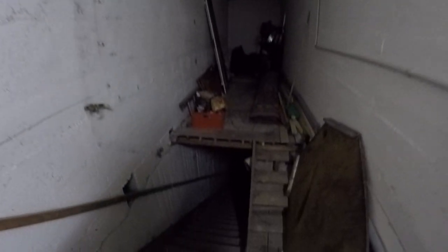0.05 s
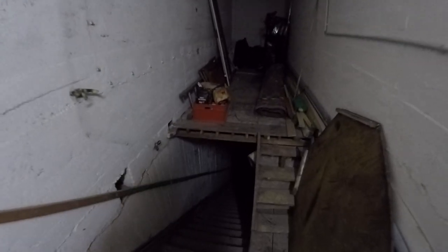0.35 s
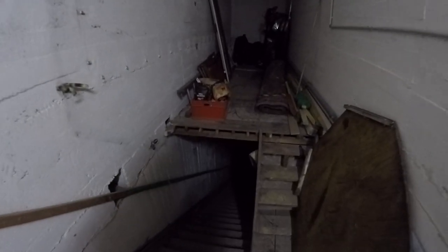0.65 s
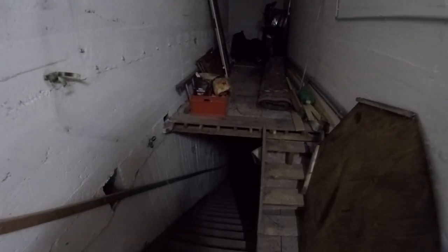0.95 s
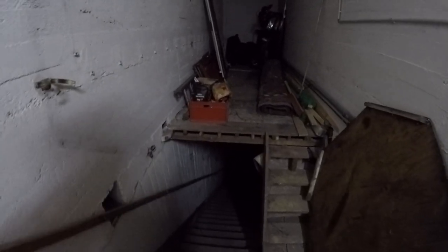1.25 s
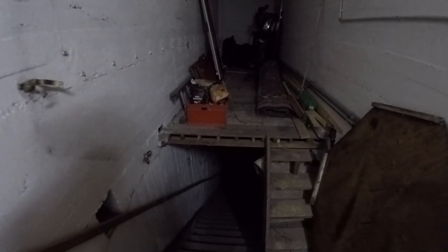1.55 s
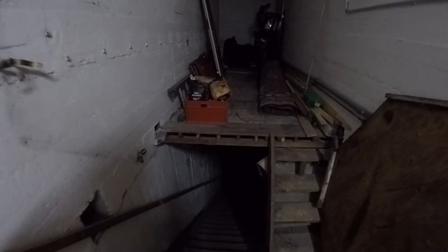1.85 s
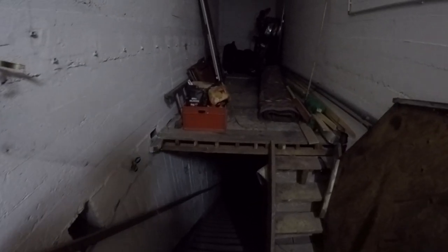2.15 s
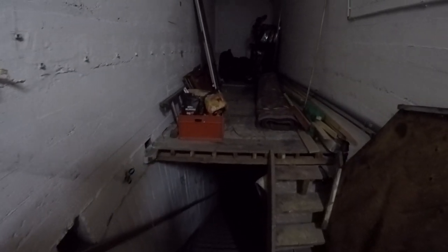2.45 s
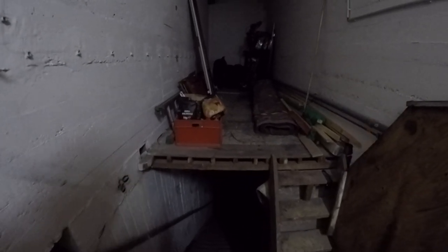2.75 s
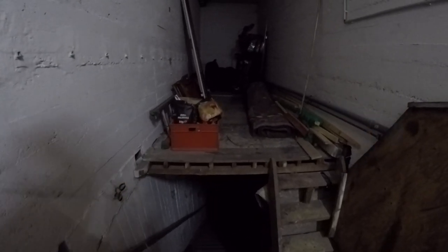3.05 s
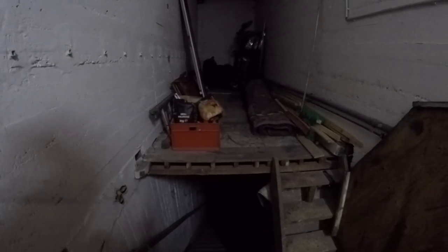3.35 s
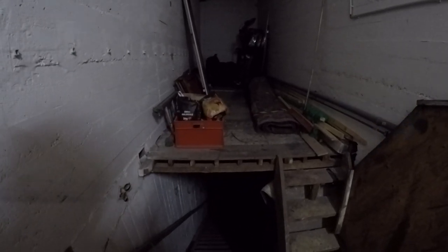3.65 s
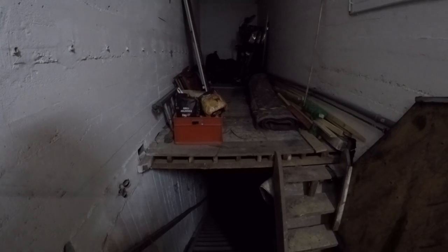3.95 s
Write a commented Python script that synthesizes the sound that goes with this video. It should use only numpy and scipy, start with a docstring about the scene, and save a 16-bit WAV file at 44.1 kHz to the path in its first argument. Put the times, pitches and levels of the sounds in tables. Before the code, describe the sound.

Someone walks slowly between bare concrete walls, with echoing heel knocks, short gritty scuffs and a faint shoe squeak at the end. The steps sit in the centre, while a wide, low rumble and a wavering machine hum fill the background.

```python
"""Slow footsteps in the narrow stairwell of a concrete bunker, dead centre in a stereo microphone pair.
Heels knock, soles scrape and shuffle over grit, and rubber squeaks once, all echoing between bare walls.
Clothes rustle softly as the legs swing. Behind the walker the building rumbles, wide and deep,
and a distant machine hums in low, beating tones."""
import sys
import numpy as np
from scipy import signal
from scipy.fft import rfft, irfft
from scipy.io import wavfile

SR = 44100
rng = np.random.default_rng(int(sys.argv[2]) if len(sys.argv) > 2 else 0)


def int16_out(signal):
    """Quantize to a 16-bit WAV file."""
    q = np.round(np.clip(np.atleast_2d(signal).T, -1, 1) * 32767)
    wavfile.write(sys.argv[1], SR, q.astype(np.int16))


N = 176400
TIME = np.arange(N) / SR


def heel_knocks():
    """Each contact is a softened click that rings shoe and floor; the weight behind it adds a thud."""
    # shoe meeting floor: start_s, level_db, hardness_hz (low-pass corner), thud_db
    contacts = [(.128, -11, 1300, -17), (.157, -10, 2000, -10), (.202, -8.5, 795, -19),
                (0.6, -14, 1800, -20), (0.8776, 4.5, 1700, -2.5), (.923, -4.5, 495, 6.5),
                (1.062, -13, 796, -1), (1.698, -2.5, 1100, -4), (2.602, 4, 1590, -12),
                (2.619, -7.5, 3000, -15), (2.662, -7, 1000, -9), (2.828, -4, 1000, -5.5),
                (3.190, -11, 1190, -11), (3.287, -5, 2210, -17)]
    # ring of shoe and floor: pitch_hz, level_db, t60_s
    shoe_modes = [(360, -24.5, 0.013), (452, -31.5, 0.031), (597, -24, 0.014), (970, -19.5, 0.01),
                  (1370, -24.5, 0.011), (1930, -19, 0.0053), (3240, -24.5, 0.0063), (4600, -22, 0.0054)]
    # floor thumping under the walker's weight: pitch_hz, level_db, t60_s
    thud_modes = [(210, -28.5, 0.064), (252, -28, 0.1), (341, -25, 0.051), (418, -25, 0.04)]
    out, click = np.zeros(N), signal.unit_impulse(SR)
    shoe = sum((-1) ** k * from_db(db) * ring(click, hz, t60)
               for k, (hz, db, t60) in enumerate(shoe_modes))
    body = from_db(-9.5) * click + shoe
    thud = sum(from_db(db) * ring(click, hz, t60) for hz, db, t60 in thud_modes)
    for start, db, hardness_hz, thud_db in contacts:
        knock = butter(body + from_db(thud_db) * thud, hardness_hz, "low")
        add(out, start, from_db(db) * stairwell(knock, room_db=-1))
    return butter(out, 178, "high")


def sole_scrapes():
    """A sole grinds over grit: fairly even grains, full in the midrange, that stop quickly."""
    # scrapes: start_s, length_s, level_db, tilt_db_per_octave, attack_s
    strokes = [(.894, 0.015, -39, 3, 0.0044), (.95, 0.037, -44.5, 0, 0.012),
               (2.065, 0.041, -28, 0.7, 0.0059), (2.12, 0.12, -41.5, 0, 0.033),
               (2.338, 0.029, -45.5, 1, 0.0068), (2.621, 0.011, -38, -0.5, 0.002),
               (2.65, 0.045, -46, 4.5, 0.0091), (2.70, 0.064, -44, 2, 0.037),
               (3.287, 0.027, -37.5, 0.5, 0.0062), (3.311, 0.017, -27, 0.5, 0.0069),
               (3.345, .04, -47, 0, 0.011)]
    # tone of ground grit: frequency_hz, level_db
    spectrum = [(200, -36), (400, -2), (620, -1.5), (900, -2.5), (1350, -5), (1650, -6.5), (2200, -0.5),
                (2750, -1.5), (3700, -3.5), (5000, -8), (7000, -15.5), (10000, -22.5), (15000, -33)]
    return friction(strokes, spectrum, release_s=0.0065, grains_per_s=4000, room_db=-0.5, spread_db=2.5)


def sole_shuffles():
    """A sole slides lightly: a thinner crackle of uneven grains that lets go more gently."""
    # slides: start_s, length_s, level_db, tilt_db_per_octave, attack_s
    strokes = [(.435, 0.092, -48.5, 1, 0.028), (2.43, 0.046, -42, -1, 0.024), (2.48, 0.12, -53, -2, 0.014),
               (2.522, 0.0083, -42, -3, 0.0042), (2.735, 0.075, -46.5, 2.5, 0.019),
               (3.20, 0.2, -42.5, -1.5, 0.08), (3.44, 0.069, -49, 2.5, .02),
               (3.665, 0.039, -52.5, -3.5, .02), (3.871, 0.0086, -38.5, -0.5, 0.0033),
               (3.912, .012, -44, -20, .004)]
    # tone of brushed grit: frequency_hz, level_db
    spectrum = [(500, -28), (1400, -9), (2200, 0), (3300, 0), (4300, -2.5), (6000, -8.5), (9000, -16),
                (15000, -26)]
    return friction(strokes, spectrum, release_s=0.015, grains_per_s=5000, room_db=-1, spread_db=6.0)


def friction(strokes, spectrum, release_s, grains_per_s, room_db, spread_db):
    """Grains of grit crack under the sole while each stroke rises, holds and lets go."""
    out, t = np.zeros(N), TIME[:SR]
    for start, length, db, tilt_db, attack_s in strokes:
        grain_db = spread_db * np.minimum(rng.exponential(1, SR), 4)
        sizes = from_db(grain_db) * rng.choice([-1, 1], SR)
        grains = sizes * (rng.random(SR) < grains_per_s / SR)
        pressure = np.clip(t / attack_s, 0, 1) * np.exp(-np.maximum(t - length, 0) / release_s)
        stroke = pressure * coloured(grains, spectrum, tilt_db)
        add(out, start, from_db(db) * stairwell(stroke, room_db))
    return out


def sole_squeak():
    """Rubber sticks and slips in a short, rough, rising chirp."""
    # faint squeak: start_s, length_s, level_db, first_hz, last_hz
    chirps = [(3.884, .04, -45, 2920, 3470)]
    out, t = np.zeros(N), TIME[:SR]
    rough_hz = 250
    for start, length, db, first_hz, last_hz in chirps:
        along = np.clip(t / length, 0, 1)
        hz = first_hz + (last_hz - first_hz) * along + rough_hz * drift(rate_hz=700).real[:SR]
        chirp = np.sin(np.pi * along) * np.sin(2 * np.pi * np.cumsum(hz) / SR)
        add(out, start, from_db(db) * stairwell(chirp, room_db=-1))
    return out


def clothes():
    """Cloth rubs in soft, fluttering swells as a leg swings, heard without echo."""
    # bell-shaped rustles: middle_s, half_width_s, level_db
    rustles = [(.12, 0.18, -56), (0.333, 0.076, -54), (1.387, 0.075, -51.5), (1.494, 0.077, -56.5),
               (1.736, .14, -54), (2.025, 0.089, -52.5), (3.133, 0.13, -55), (3.79, 0.072, -59)]
    # tone of the cloth: frequency_hz, level_db
    spectrum = [(400, -21), (1000, 5), (2200, 4.5), (4500, 2), (7000, -3), (10000, -9.5), (15000, -16)]
    swing = sum(from_db(db) * np.exp(-.5 * ((TIME - s) / half) ** 2) for s, half, db in rustles)
    flutter = from_db(0.47 * drift(rate_hz=25).real)
    return swing * flutter * coloured(rng.standard_normal(N), spectrum)


def stairwell(x, room_db):
    """One second of direct sound, near-wall slaps and tail; every spot on the floor echoes differently."""
    gap_s, decay_s = 0.002, 0.0083
    t = TIME[:SR] - gap_s
    slaps = rng.standard_normal(SR) * (t > 0) * np.exp(-abs(t) / decay_s)
    slaps = from_db(-3) * butter(slaps / np.sqrt(np.sum(slaps ** 2)), 2000, "low", order=1)
    return x + signal.fftconvolve(x, slaps + from_db(room_db) * wall_tail())[:SR]


def wall_tail():
    """Dense echoes between the walls build up and die away band by band; unit energy."""
    # reverberation of bare concrete: frequency_hz, t60_s
    decay_times = [(150, 1), (400, 0.61), (1000, 0.54), (2500, 0.41), (5000, 0.39), (12000, 0.46)]
    t, edges, build_s = TIME[:SR], np.geomspace(80, 18000, 8), 0.0057
    white, hz = rfft(rng.standard_normal(SR)), np.fft.rfftfreq(SR, 1 / SR)
    out = np.zeros(SR)
    for lo, hi in zip(edges, edges[1:]):
        band = irfft(white * (hz >= lo) * (hz < hi), SR)
        out += band * np.exp(-np.log(1000) * t / at_hz(decay_times, np.sqrt(lo * hi)))
    out *= 1 - np.exp(-t / build_s)
    return out / np.sqrt(np.sum(out ** 2))


def building_rumble():
    """Room tone: deep noise of the building that swells slowly and thins upward to a steady faint hiss."""
    # rumble alike in both channels: frequency_hz, level_db
    mid_spectrum = [(10, -17), (21, -1), (26, 4), (32, 1.5), (55, -3), (74, 1), (90, -2), (112, -6.5),
                    (128, -5), (150, -12), (250, -17), (310, -24), (420, -26), (600, -32), (1000, -41),
                    (1600, -45), (3000, -49.5), (5000, -53.5), (8000, -59.5), (15000, -65)]
    # rumble opposed between the channels: frequency_hz, level_db
    side_spectrum = [(10, -33), (27, 14.5), (45, -3.5), (65, -5), (105, -9), (140, -18), (200, -14.5),
                     (240, -22), (420, -25.5), (700, -32), (1000, -41), (2000, -52), (4000, -77.5),
                     (7000, -79.5), (15000, -75)]
    # rise and fall of the low end: time_s, gain_db
    swell_points = [(0, -2), (.25, 3.5), (.55, 1.5), (.76, -3.5), (.9, -1), (1.45, 2), (1.8, -1), (2.25, 3),
                    (2.5, 0), (2.85, 1.5), (3.3, 1.5), (3.65, -1.5), (4, 3)]
    mid = from_db(-21.5) * coloured(rng.standard_normal(N), mid_spectrum)
    side = from_db(-22) * coloured(rng.standard_normal(N), side_spectrum)
    noise = stereo(mid, side)
    swell = from_db(np.interp(TIME, *np.transpose(swell_points)))
    return noise + (swell - 1) * butter(noise, 170, "low", order=1)


def machine_hum():
    """Low tones of a distant machine beat and waver, a little stronger on the right."""
    # machine tones: pitch_hz, relative_mid_db, relative_side_db
    tones = [(119.5, -1, -10.5), (122.7, -9.5, -27), (123.55, -5.5, -15), (211, -19, -23.5),
             (269, -21, -24), (360.5, -23.5, -27), (481.5, -31.5, -33)]
    # the hum swelling and fading: time_s, gain_db
    swell_points = [(0, -30.5), (.13, -32.5), (.26, -22.5), (.40, -33), (.50, -24.5), (.62, -25),
                    (.77, -32.5), (.98, -31), (1.08, -22), (1.42, -29), (1.57, -20.5), (1.76, -31),
                    (1.86, -25), (2.08, -24), (2.2, -34), (2.55, -33.5), (2.72, -20), (2.87, -30),
                    (3.17, -21), (3.40, -29.5), (3.68, -31.5), (3.78, -19), (3.92, -38.5), (4, -18)]
    pan_db, waver_depth = 1.2, 0.39

    def tone(hz):
        steady = np.exp(2j * np.pi * (hz * TIME + rng.random()))
        waver = 1 + waver_depth * drift(rate_hz=2.7)
        return rms_one((steady * waver).real)
    swell = from_db(np.interp(TIME, *np.transpose(swell_points)))
    hum = sum(stereo(from_db(db) * tone(hz), from_db(side_db) * tone(hz)) for hz, db, side_db in tones)
    return swell * from_db([[-pan_db], [pan_db]]) * hum


def from_db(db):
    """Decibels to gain."""
    return 10 ** (np.asarray(db) / 20)


def rms_one(x):
    """Scale to rms 1."""
    return x / np.sqrt(np.mean(x ** 2) + 1e-20)


def at_hz(points, hz):
    """Read a table on a log-frequency axis."""
    frequencies, values = np.transpose(points)
    return np.interp(np.log(np.maximum(hz, 1)), np.log(frequencies), values)


def butter(x, hz, kind, order=2):
    """Causal Butterworth filter."""
    sections = signal.butter(order, np.clip(hz, 10, SR / 2 - 100), kind, fs=SR, output="sos")
    return signal.sosfilt(sections, x + 1e-18)


def coloured(x, spectrum, tilt_db=0):
    """Give a steady signal a spectrum, tilted per octave; rms 1."""
    hz = np.maximum(np.fft.rfftfreq(len(x), 1 / SR), 1)
    bass_rolloff = np.minimum(hz / spectrum[0][0], 1) ** 2
    gain = from_db(at_hz(spectrum, hz) + tilt_db * np.log2(hz)) * bass_rolloff
    return rms_one(irfft(rfft(x) * gain, len(x)))


def drift(rate_hz):
    """Complex noise that wanders at up to about rate_hz; rms 1."""
    hz = np.fft.fftfreq(N, 1 / SR)
    white = rng.standard_normal(N) + 1j * rng.standard_normal(N)
    slow = np.fft.ifft(white / (1 + (hz / rate_hz) ** 2) ** 2)
    return slow / np.sqrt(np.mean(abs(slow) ** 2))


def ring(x, hz, t60):
    """Resonator: a unit click starts a decaying sine of height about 1."""
    radius, angle = np.exp(-np.log(1000) / (t60 * SR)), 2 * np.pi * hz / SR
    return signal.lfilter([0, np.sin(angle)], [1, -2 * radius * np.cos(angle), radius ** 2], x + 1e-18)


def stereo(mid, side):
    """Left and right from mid and side."""
    return np.array([mid + side, mid - side])


def add(out, start_s, sound):
    """Mix a sound in at a time."""
    i = int(np.clip(start_s * SR, 0, N - 1))
    out[i:i + len(sound)] += sound[:N - i]


def scene():
    """The walker straight ahead of the microphone, over wide rumble and hum."""
    grit = sole_scrapes() + sole_shuffles()
    background = building_rumble() + machine_hum()
    walker = grit + clothes() + heel_knocks() + sole_squeak()
    return walker + background


def record(dry):
    """A steep low-pass cuts the top above 15.4 kHz."""
    return signal.sosfilt(signal.ellip(12, .1, 80, 15400, fs=SR, output="sos"), dry)


dry = scene()
out = record(dry)
int16_out(out)
```